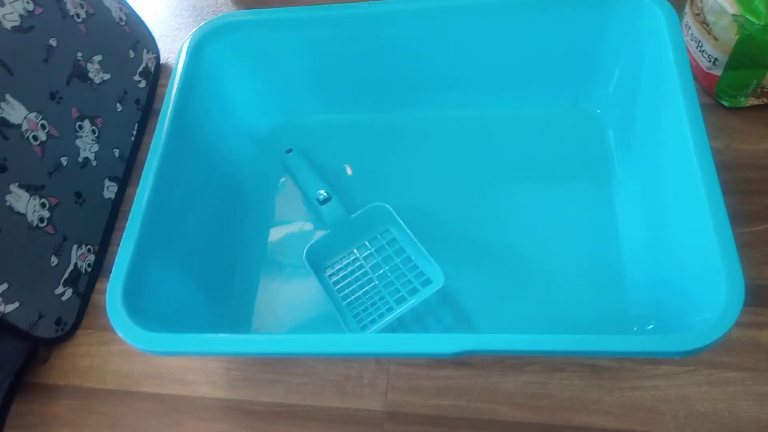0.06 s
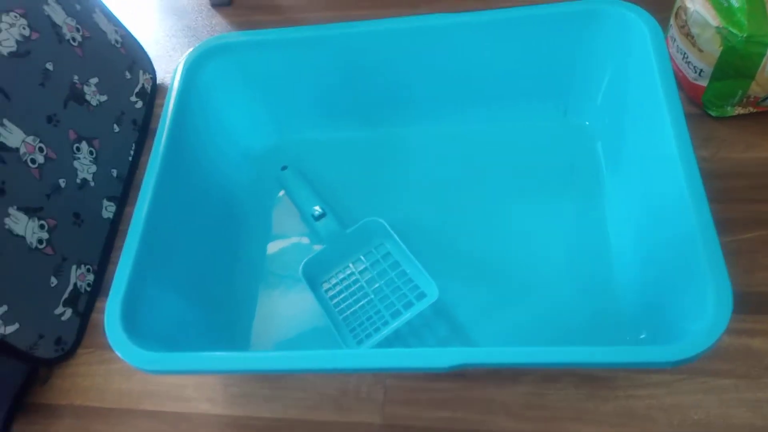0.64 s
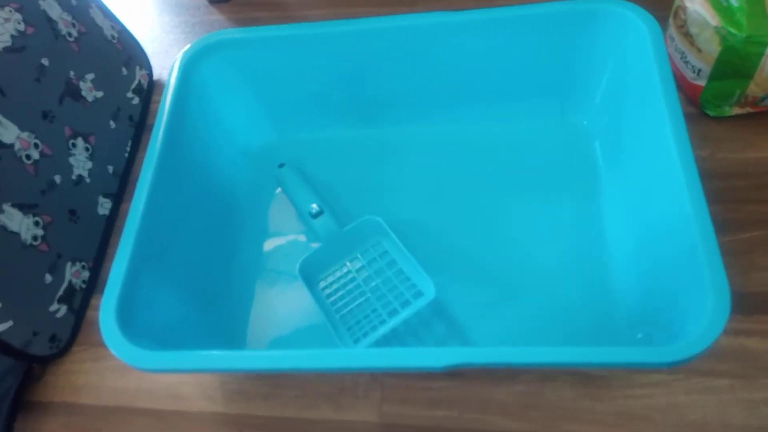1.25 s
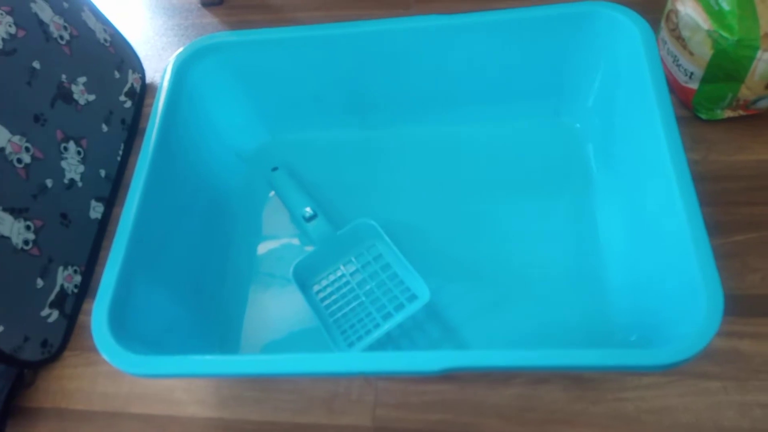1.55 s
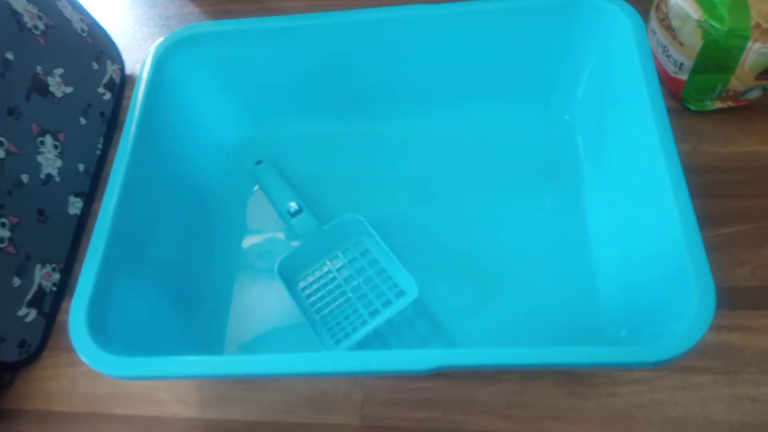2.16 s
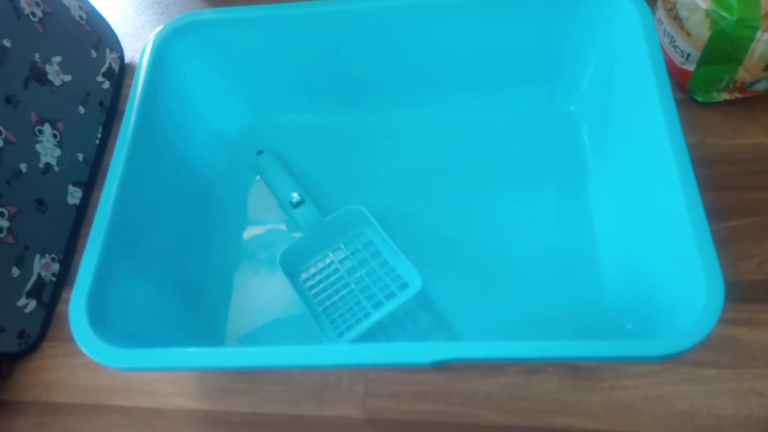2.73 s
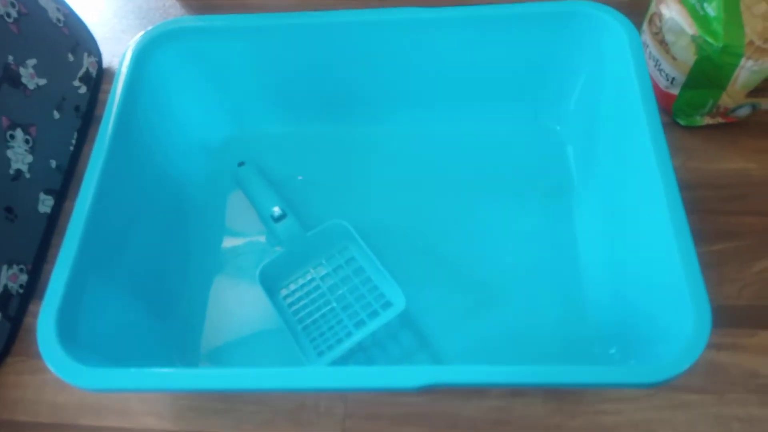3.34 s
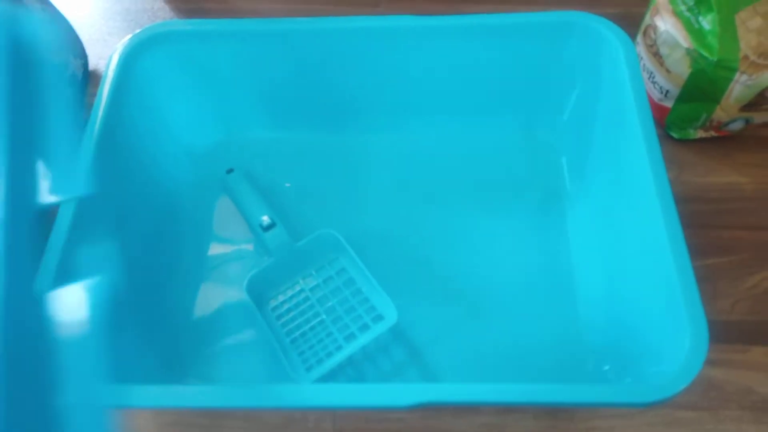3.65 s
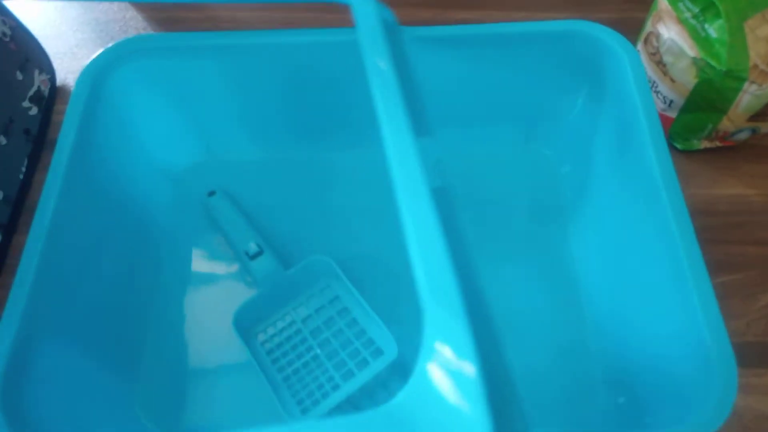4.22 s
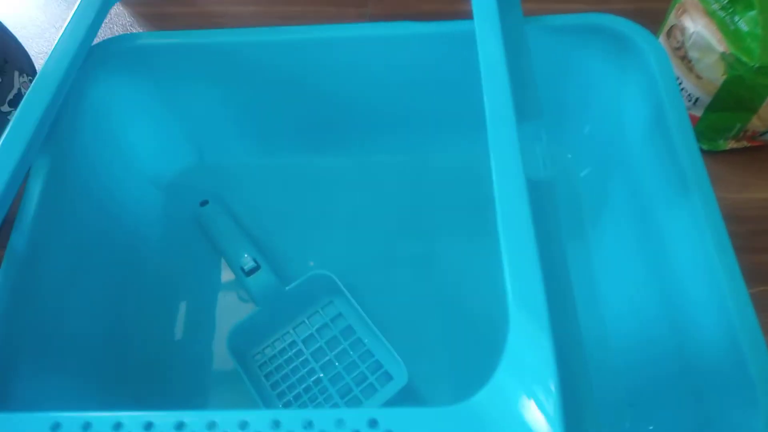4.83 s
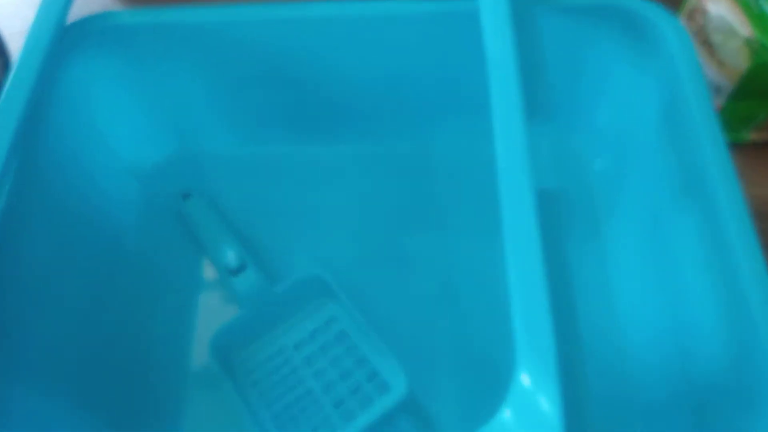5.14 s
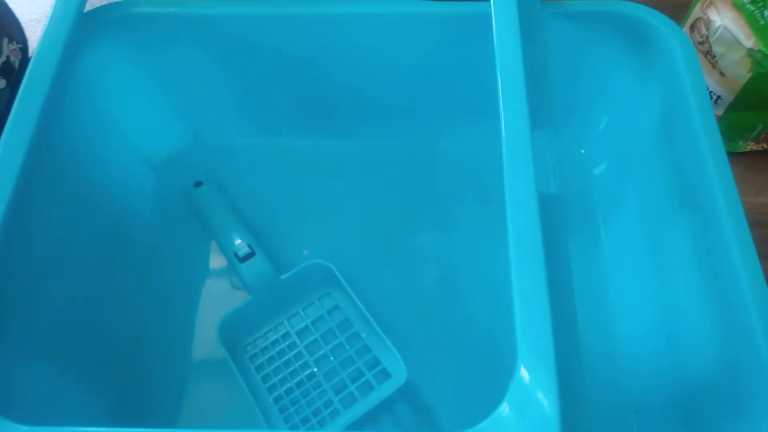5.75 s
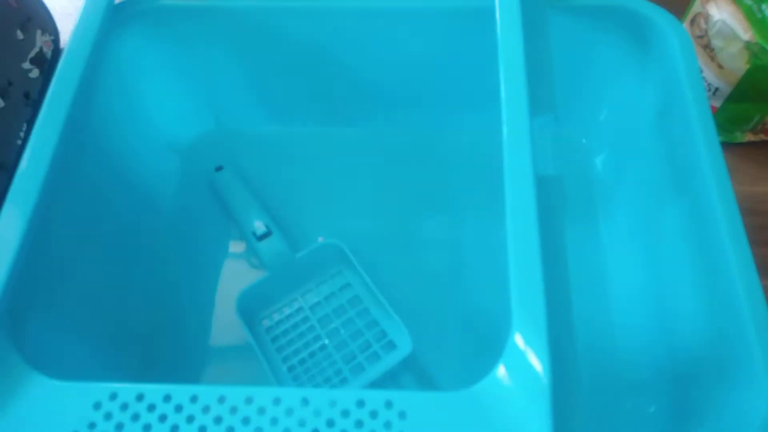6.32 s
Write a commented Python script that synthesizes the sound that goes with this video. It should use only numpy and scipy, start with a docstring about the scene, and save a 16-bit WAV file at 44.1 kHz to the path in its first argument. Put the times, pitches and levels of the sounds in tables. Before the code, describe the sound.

A hard plastic tray scrapes, knocks and rattles into a hollow plastic pan in a small room.

```python
"""Hands rub on a perforated plastic tray and pick it up; from about 1 s it scrapes and knocks, each
contact ringing its thin, well-damped walls. At 4.2 s it is lowered into a plastic pan on a wooden
floor and rattles into place, the heavy landings rocking the hollow pan. Let go at 5.5 s, it rings on
faintly, and a last scrape and rubs follow. Throughout, a small room answers, over a low hum and a
faint electric whine that comes and goes."""
import sys
import numpy as np
from scipy import signal
from scipy.fft import rfft, irfft
from scipy.io import wavfile
from scipy.ndimage import uniform_filter1d

SR = 44100
rng = np.random.default_rng(int(sys.argv[2]) if len(sys.argv) > 2 else 0)


def dump_mix(stems):
    """Bounce the given channels to the path in sys.argv[1] as a 16-bit WAV at rate SR."""
    frames = np.atleast_2d(stems).T  # one column per channel
    limited = np.clip(frames, -1, 1)  # hard clip at full scale
    pcm = np.round(limited * 32767).astype(np.int16)
    wavfile.write(sys.argv[1], SR, pcm)


N = 285723
SHORT, LONG = 2048, 32768  # samples for a tick and for a long tail
FIRM_BLOW_DB = -26

# Plastic-on-plastic hits; knock() trims the three levels slightly: (time [s], ring level [dB],
# ring centre [Hz], weight [dB re ring], crack [dB re ring], top-octave lift of the crack [dB])
KNOCKS = [(0.865, -57, 2540, -21, -6, -2.5), (1.1541, -24, 2370, -20.5, -14, 6),
          (1.178, -31.5, 2230, -16.5, -18.5, -5), (1.2872, -48.5, 2500, -36, -16, 15),
          (1.377, -42.5, 2220, -20, -22, 2), (1.413, -36, 2200, -17.5, -24, 5),
          (1.4403, -32.5, 2480, -18, -16, 7), (2.1042, -21, 2300, -27, -14.5, 5),
          (2.1287, -31.5, 2150, -17.5, -22.5, 10), (2.3232, -48, 2500, -27, -17, 3.5),
          (2.3521, -26, 2360, -19, -15.5, 4.5), (2.3569, -32.5, 2000, -12.5, -15, 7),
          (2.4405, -28, 2420, -20.5, -26, -4), (2.4494, -31, 2430, -21, -25, -3),
          (2.672, -50, 2540, -28, -12, -14.5), (2.745, -50, 3050, -33, -1.5, -26),
          (2.776, -56.5, 3000, -31, -2.5, -27.5), (3.1514, -69, 2440, -15, 1, -18.5),
          (4.2193, -41, 2220, -1, -11, 6), (4.2317, -44, 2770, -4, -11, -14),
          (4.2771, -47.5, 2760, 3, -7.5, -1), (4.423, -34.5, 2560, -11.5, -16.5, -4.5),
          (4.482, -52.5, 2210, 3, -9, 10), (4.777, -20, 2660, -12, -9.5, -8.5),
          (4.807, -28, 2410, -14.5, -8.5, -6.5), (4.8314, -34.5, 2350, -11, -7.5, -16),
          (4.844, -22, 2490, -15.5, -10.5, -13.5), (4.8669, -30.5, 2450, -13.5, -10.5, -4.5),
          (4.884, -34.5, 2380, -5, -2, -9.5), (4.947, -33, 2500, -14, -16.5, -22.5),
          (5.0045, -38, 2220, -14.5, -34, -13.5), (5.201, -25, 2040, -11, -17.5, -8),
          (5.222, -41.5, 2330, -6, -8.5, -17), (5.3222, -32, 1810, -12, -34, -0.5),
          (5.361, -42.5, 2220, -24, -20.5, -11), (5.367, -37.5, 1895, -8, -15, -11.5),
          (5.424, -19.5, 2380, -23, -14.5, -5.5)]
def knocks():
    """All the tray's hits and its last ring, as one face radiates them."""
    out = np.zeros(N)
    for time, db, *tone in KNOCKS:
        focus_db, _ = voicing(time, db)
        add(out, time, knock(db, *tone, focus_db))
    add(out, 5.474, free_ring())  # the hands let go
    return out


def voicing(time, db, in_pan_s=4.6):
    """Ring fall-off an octave off centre [dB] and side note [Hz], in the hand or seated in the pan."""
    focus_db, note_hz = (5.5, 202) if time < in_pan_s else (14.5, 243)
    force = undb(db - FIRM_BLOW_DB)
    return focus_db * force ** .35, note_hz * force ** .1  # harder blows ring purer, stiffen the sides


# The tray's thin, dry wall modes: (frequency [Hz], relative level [dB], t60 [s])
WALL = [(400.5, -5, 0.023), (526.5, -3.5, 0.039), (659, -2.5, .025), (809.4, -2, 0.033), (976, -3, 0.016),
        (1250, -4, 0.018), (1478, -1, 0.013), (1838, -0.5, .014), (2224, 0.5, .014), (2450, 2, .014),
        (2876, -1, 0.015), (3253, 1.5, 0.011), (3792, -6.5, 0.018), (4540, -8, 0.014)]
def knock(db, centre_hz, weight_db, crack_db, top_db, focus_db, contact_s=.0005, rim_s=.001211):
    """One hit in three layers, ring, body and crack; the spot struck favours some wall modes."""
    t = np.arange(SHORT) / SR
    hz = np.array(WALL)[:, 0]
    low = hz < 880
    press = 1 - np.exp(-(t / contact_s) ** 2)  # the plastic gives a little before the force peaks
    spot = rng.choice([-1, 1], len(hz)) * undb(1.2 * rng.standard_normal(len(hz)))
    focus = undb(-focus_db * np.log2(hz / centre_hz) ** 2)
    wall = press * ring(WALL, spot * ~low * focus, SHORT, detune=.037)
    wall = band(wall, 850, 6000)
    add(wall, rim_s * rng.uniform(.6, 1.386), .77 * wall)  # the bending wave returns once from the rim
    body = band(ring(WALL, spot * low, SHORT, detune=.05), 350, 1100)
    return (set_attack(wall, db + .5)
            + set_attack(body, db + weight_db - 1)
            + set_attack(crack(press, top_db), db + crack_db + .23))


# EQ curve of a hit's sharp edge: (frequency [Hz], relative level [dB])
CRACK_EQ = [(2500, -22.5), (4300, 5), (5200, -5.5), (6100, 2.5), (7000, -3.5), (8200, -13.5), (10500, -7),
            (12800, -27.5), (15200, -21.5), (17000, -29.5)]
def crack(press, top_db, decay_s=.0024):
    """A snap of noise at contact: sharp edges reach into the top octave, flat faces do not."""
    t = np.arange(SHORT) / SR
    hz, db = np.transpose(CRACK_EQ)
    lift_db = np.interp(hz, [6800, 9500], [0, top_db])
    burst = rng.standard_normal(SHORT) * press * np.exp(-t / decay_s)
    return colour(burst, np.column_stack([hz, db + lift_db]))


# The tray's lingering modes: (frequency [Hz], relative level [dB], t60 [s])
FREE_MODES = [(2370, -1.5, 0.77), (2420, -3.5, .7), (2730, -1, .85)]
def free_ring():
    """Let go after its last blow, the tray rings on faintly."""
    return set_attack(ring(FREE_MODES, np.ones(len(FREE_MODES)), LONG, detune=.004), db=-57.5)


# Hollow side-wall modes: (pitch [multiple of the side note], relative level [dB], t60 [s])
SIDE_MODES = [(.68, -7, 0.12), (.85, -2, .13), (1, 0.5, 0.17), (1.22, -1, 0.13), (1.38, -6, .07)]
def side_boom(boost_db=10):
    """The broad sides swing under the weight of each hit; their note moves with grip and seating."""
    out = np.zeros(N)
    for time, db, _, weight_db, *_ in KNOCKS:
        _, note_hz = voicing(time, db)
        modes = np.array(SIDE_MODES) * [note_hz, 1, 1]
        rocking = min(undb(db - FIRM_BLOW_DB), 1) ** .31  # a light touch hardly rocks them
        add(out, time, rocking * swing(modes, db + weight_db + boost_db))
    return out


# Deep modes of the pan's bottom: (frequency [Hz], relative level [dB], t60 [s])
BOTTOM_MODES = [(75, -14, 0.7), (113, -2, .28), (136, -4.5, 0.16)]
# Thumps on the floor: (time [s], level before the soft onset [dB])
BUMPS = [(1.585, -54), (2.353, -52), (2.442, -46), (4.22, -35.5), (4.244, -30.5), (4.427, -46.5),
         (4.81, -38), (5.198, -36.5), (5.321, -43)]
def floor_bumps():
    """The pan's bottom bumps on the wooden floor."""
    out = np.zeros(N)
    for time, db in BUMPS:
        add(out, time, swing(BOTTOM_MODES, db))
    return out


def swing(modes, db, rise_s=.004):
    """A broad panel takes a moment to swing up under the weight."""
    rise = 1 - np.exp(-np.arange(LONG) / SR / rise_s)
    gains = rng.uniform(.6, 1, len(modes))
    return rise * set_attack(ring(modes, gains, LONG, detune=.025), db)


# Strokes of the tray dragging over an edge: (start [s], length [s], level at the crest [dB])
SCRAPES = [(0.918, 0.039, -63), (1.06, 0.044, -65), (1.338, 0.2, -35), (1.563, 0.062, -68),
           (2.19, 0.075, -52), (2.252, 0.15, -54.5), (2.353, 0.18, -43.5), (2.526, .16, -51.5),
           (4.24, 0.078, -54), (4.486, .1, -61.5), (4.578, 0.23, -63.5), (4.765, .13, -36),
           (4.907, 0.3, -63.5), (5.699, 0.16, -66)]
def scrape(slips_per_s=900, catches_per_s=70, catch_db=10, spread_db=2.5, drum_db=-17):
    """Stick and slip: dense uneven ticks, some catching harder, ring four spots on the walls."""
    t = np.arange(N) / SR
    pressure = sum(undb(db) * np.sin(np.pi * np.clip((t - start) / length, 0, 1)) ** 1.6
                   for start, length, db in SCRAPES)
    slips = (rng.random(N) < slips_per_s / SR) * 1.
    catches = np.cumsum(rng.uniform(.5, 1.5, 2000)) * SR / catches_per_s
    slips[catches[catches < N].astype(int)] = undb(catch_db)
    slips *= rng.choice([-1, 1], N) * undb(spread_db * rng.standard_normal(N))
    spots = rng.integers(0, 4, N)
    rasp = np.zeros(N)
    for spot in np.unique(spots):
        tick = knock(db=0, centre_hz=2480, weight_db=-17.5, crack_db=-19.5, top_db=3, focus_db=4)
        rasp += signal.oaconvolve(slips * (spots == spot), tick)[:N]
    drum = band(slips, 230, 235)  # the slips also set the broad sides drumming
    return (rasp / rms(rasp) + undb(drum_db) * drum / rms(drum)) * pressure


# Hands and rim sliding on smooth plastic: (start [s], length [s], level [dB])
RUBS = [(0.507, .14, -80.5), (0.823, 0.13, -76), (1.054, 0.042, -72.5), (1.363, 0.1, -61.5),
        (2.543, 0.13, -65.5), (3.251, 0.36, -82), (4.495, .29, -65.5), (5.37, 0.026, -62),
        (5.726, .1, -75.5), (6.096, .22, -62)]
# EQ curve of their hiss: (frequency [Hz], relative level [dB])
RUB_EQ = [(1200, -21.5), (3200, 2), (5200, -11), (6200, 5.5), (7000, 0.5), (8400, -5.5), (9400, -4),
          (10500, 1.5), (12800, -17.5), (15300, -9.5)]
def rub(attack_s=.025, release_s=.03, grain_db=3, patchy_db=6):
    """Sliding friction: a grainy hiss whose narrow resonances come and go as the contact moves."""
    t = np.arange(N) / SR
    motion = np.zeros(N)
    for start, length, db in RUBS:
        ramps = np.minimum((t - start) / attack_s, 1 + (start + length - t) / release_s)
        motion += undb(db) * np.clip(ramps, 0, 1)
    grain = uniform_filter1d(rng.standard_normal(N), size=200)
    friction = rng.standard_normal(N) * undb(grain_db * grain / rms(grain))
    _, _, bands = signal.stft(friction, nperseg=512)
    patches = uniform_filter1d(rng.standard_normal(bands.shape), size=4, axis=0)  # across frequency
    patches = uniform_filter1d(patches, size=10, axis=1)  # across time
    _, hiss = signal.istft(bands * undb(patchy_db * patches / rms(patches)))
    hiss = colour(hiss[:N], RUB_EQ)
    return hiss / rms(hiss) * motion


# Small-room reverb by band: (centre [Hz], level [dB re direct], t60 [s])
REVERB_BANDS = [(250, -6, 0.91), (554, 3, 0.13), (1274, -3.5, 0.32), (2500, -8.5, 0.37), (4930, -7, 0.46),
                (10300, -9, .25)]
def room(x, build_s=.002, near_t60_s=.11, near_db=3):
    """Quick reflections inside the pan, then the longer wash of the room."""
    t = np.arange(LONG) / SR
    log_hz = np.log(np.maximum(np.fft.rfftfreq(LONG, 1 / SR), 1))
    log_centres = np.log(np.array(REVERB_BANDS)[:, 0])
    spectrum = rfft(rng.standard_normal(LONG))
    build = 1 - np.exp(-(t / build_s) ** 2)
    response = np.zeros(LONG)
    for share, (_, db, t60) in zip(np.eye(len(REVERB_BANDS)), REVERB_BANDS):
        fade = build * (undb(-60 * t / t60) + undb(near_db - 60 * t / near_t60_s))
        band_noise = irfft(spectrum * np.interp(log_hz, log_centres, share))
        response += undb(db) * fade / np.linalg.norm(fade) * band_noise
    return signal.fftconvolve(x, response)[:N]


# Spells of thin electric whine: (start [s], end [s], frequency [Hz], level [dB])
WHINES = [(-0.1, 3.1, 4156, -74.5), (3.85, 4.16, 4160, -69.5), (5.5, 5.78, 1691, -68.5),
          (4.5, 6.05, 4560, -82), (6.25, 6.7, 4156, -74.5)]
def whine(fade_s=.093):
    """Faint electric tones fade in and out."""
    t = np.arange(N) / SR
    return sum(undb(db) * wavering_tone(hz) * np.clip(np.minimum(t - start, end - t) / fade_s, 0, 1)
               for start, end, hz, db in WHINES)


# EQ curve of the room's air: (frequency [Hz], relative level [dB])
AIR_EQ = [(15, -53), (25, -27), (80, -2), (206, -13), (285, -11.5), (363, -14.5), (394, -22), (2110, -23.5),
          (3520, -27.5), (4250, -23), (4870, -35), (6050, -30.5), (7920, -40), (10700, -40.5),
          (16000, -45.5)]
# Tones of the low hum: (frequency [Hz], level [dB])
HUM = [(317, -81.5), (361, -78)]
def room_tone(air_db=-69.5):
    """A steady bed of dark air noise and low hum."""
    air = undb(air_db) * colour(rng.standard_normal(N), AIR_EQ)
    return air + sum(undb(db) * wavering_tone(hz) for hz, db in HUM)


def wavering_tone(hz, waver_hz=2.8):
    """A sine of unit power whose pitch wanders slightly."""
    drift = uniform_filter1d(rng.standard_normal(N), size=4000)
    pitch_hz = hz + waver_hz * drift / rms(drift)
    return np.sqrt(2) * np.sin(2 * np.pi * np.cumsum(pitch_hz) / SR)


def ring(modes, gains, size, detune):
    """Damped modes; grip and load shift each a little from blow to blow."""
    hz, db, t60 = np.transpose(modes)[:, :, None]
    t = np.arange(size) / SR
    hz = hz * (1 + detune * rng.standard_normal(hz.shape))
    return gains @ (undb(db - 60 * t / t60) * np.sin(2 * np.pi * hz * t))


def colour(x, curve):
    """Causal EQ along a (frequency [Hz], level [dB]) curve, scaled to unit power gain."""
    hz, db = np.transpose(curve)
    grid_hz = np.maximum(np.fft.rfftfreq(SHORT, 1 / SR), 1)
    gain = undb(np.interp(np.log(grid_hz), np.log(hz), db))
    cepstrum = irfft(np.log(gain))
    cepstrum[1:SHORT // 2] *= 2  # fold onto positive time for minimum phase
    cepstrum[SHORT // 2 + 1:] = 0
    response = irfft(np.exp(rfft(cepstrum)))
    return signal.fftconvolve(x, response / np.linalg.norm(response))[:len(x)]


def band(x, lo_hz, hi_hz):
    """Band-pass filter."""
    return signal.sosfilt(signal.butter(2, [lo_hz, hi_hz], "band", fs=SR, output="sos"), x)


def set_attack(x, db):
    """Scale x so that its first 5 ms sit at this level."""
    return x * undb(db) / rms(x[:SR // 200])


def add(out, time, x):
    """Mix x into out from this time [s] on."""
    i = int(time * SR)
    out[i:i + len(x)] += x[:len(out) - i]


def undb(db):
    """Decibels to gain."""
    return 10 ** (np.asarray(db) / 20)


def rms(x):
    """Root mean square, never zero."""
    return np.sqrt(np.mean(x ** 2)) + 1e-12


def scene(faces=2, hollow_send_db=-8.5):
    """One wall is heard directly; the other faces feed the room, each with its own mix of modes."""
    sliding = scrape() + rub()
    hollow = band(side_boom() + floor_bumps(), 52, 900)
    knock_wash = sum(room(knocks()) for _ in range(faces)) / np.sqrt(faces)
    direct = knocks() + sliding + hollow
    wash = knock_wash + room(sliding + undb(hollow_send_db) * hollow)
    return (direct + wash + room_tone() + whine())[None]


def record(dry, top_hz=16300):
    """A steep high cut on the whole mix."""
    return signal.sosfilt(signal.ellip(8, .2, 70, top_hz, fs=SR, output="sos"), dry)


dry = scene()
out = record(dry)
dump_mix(out)
```